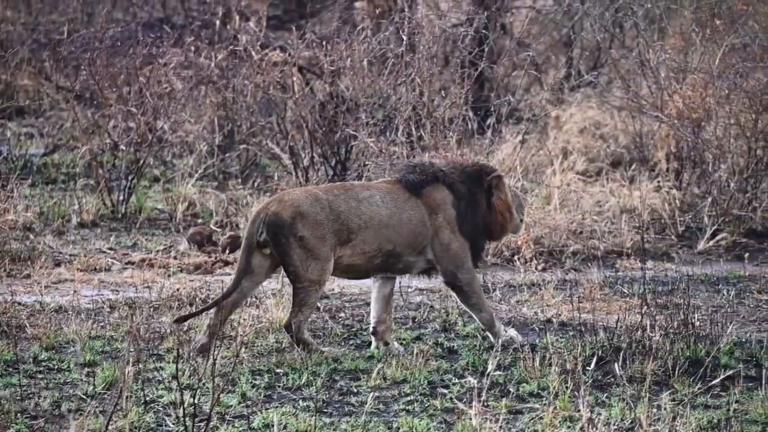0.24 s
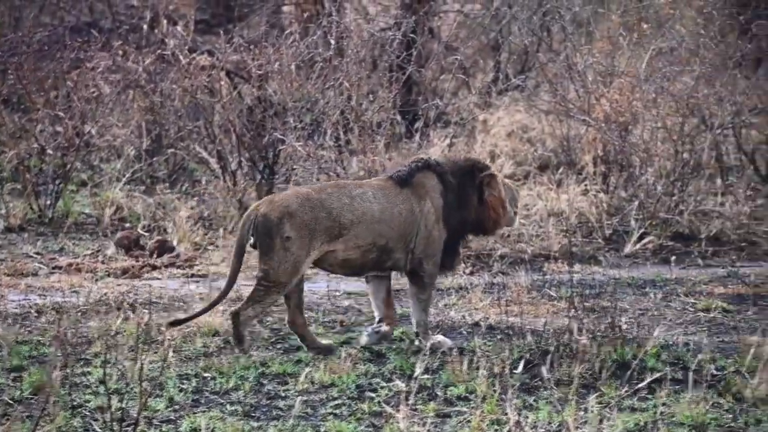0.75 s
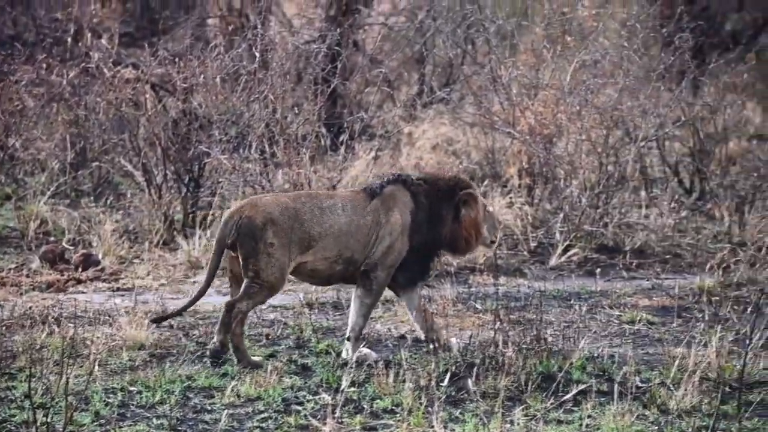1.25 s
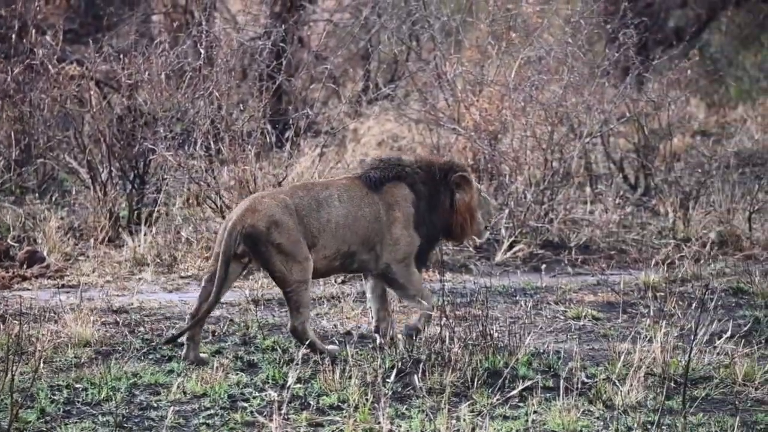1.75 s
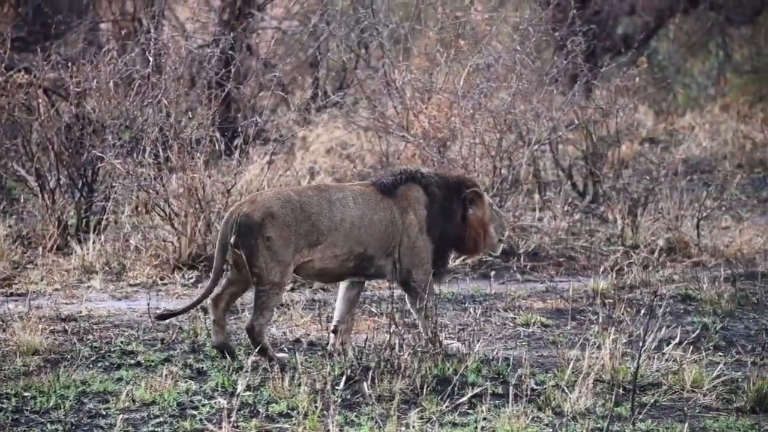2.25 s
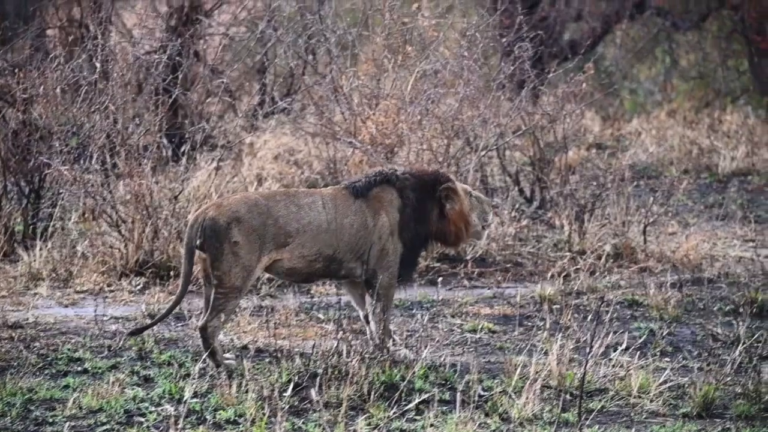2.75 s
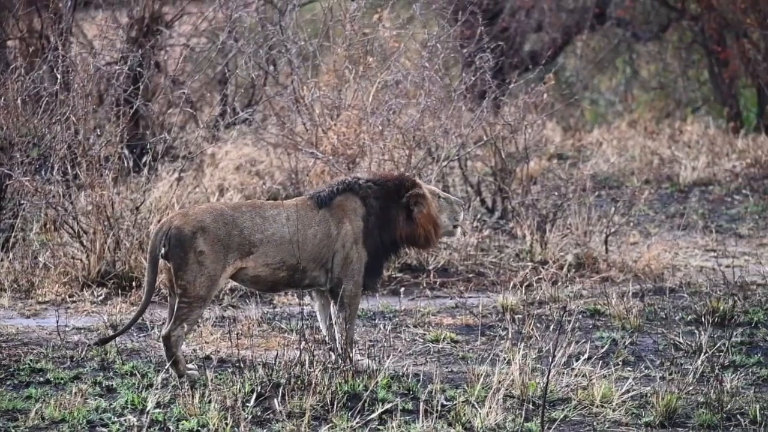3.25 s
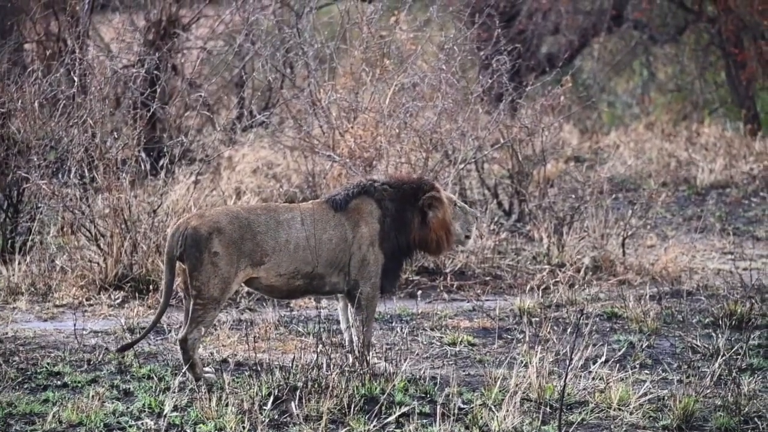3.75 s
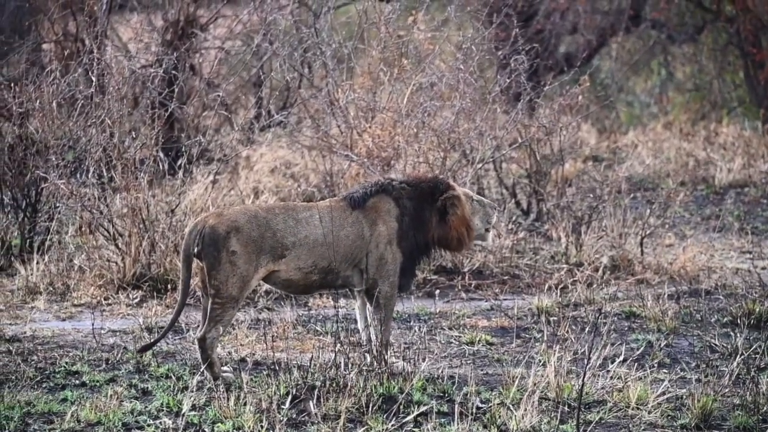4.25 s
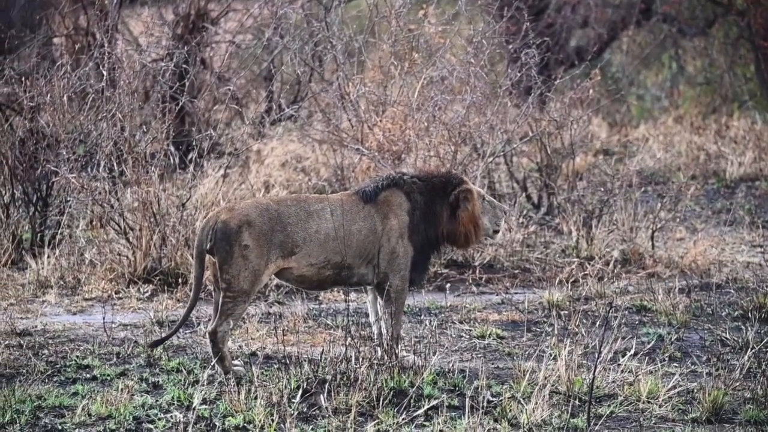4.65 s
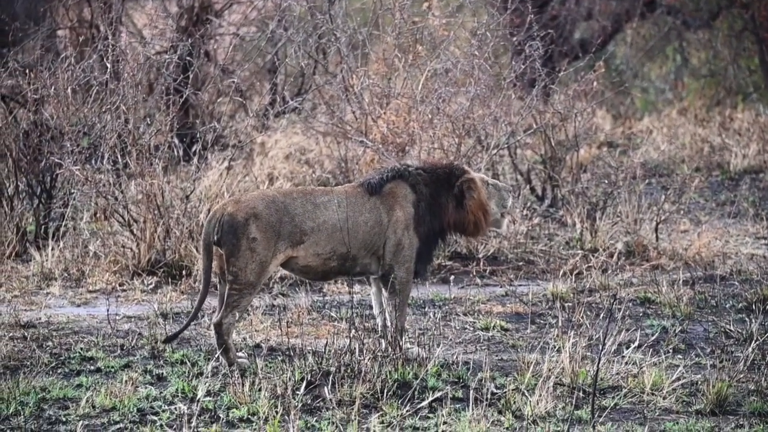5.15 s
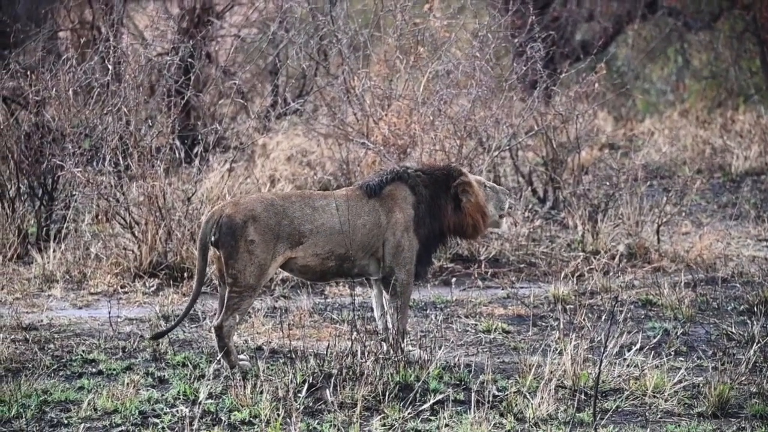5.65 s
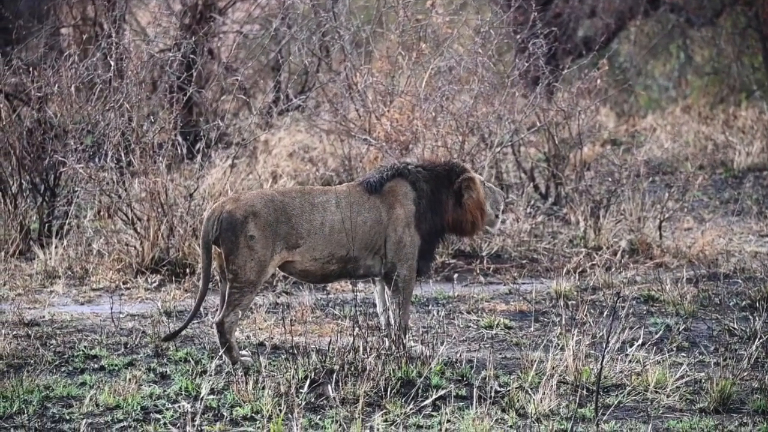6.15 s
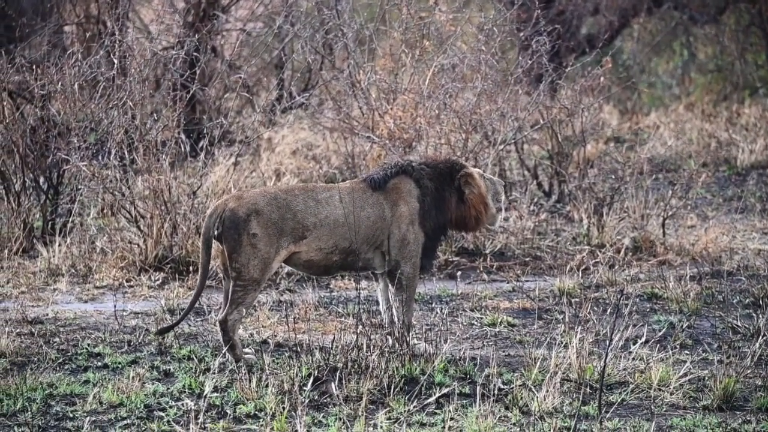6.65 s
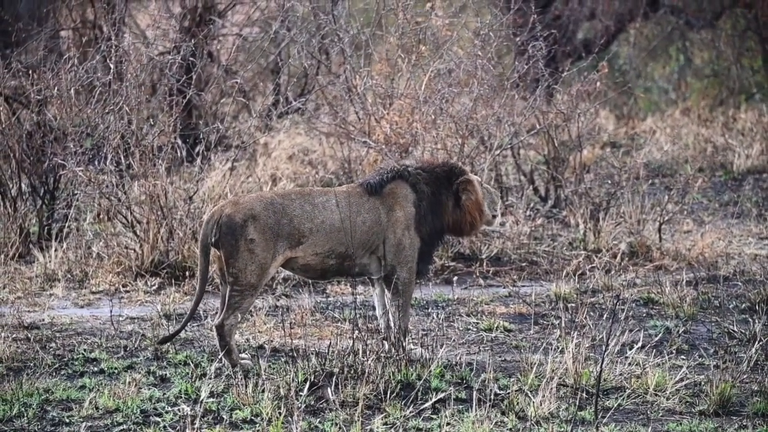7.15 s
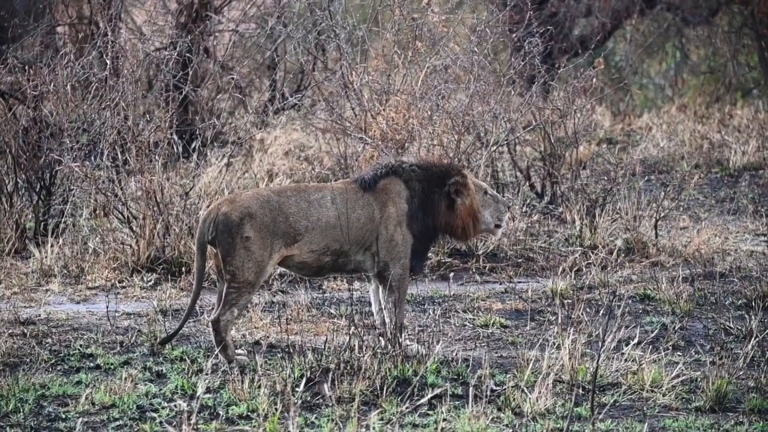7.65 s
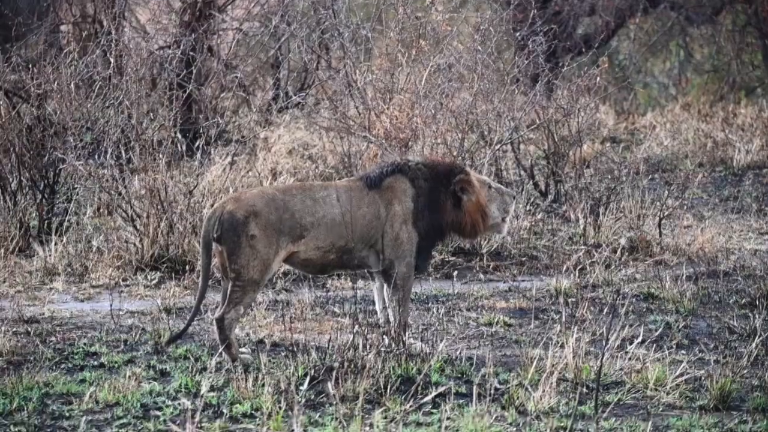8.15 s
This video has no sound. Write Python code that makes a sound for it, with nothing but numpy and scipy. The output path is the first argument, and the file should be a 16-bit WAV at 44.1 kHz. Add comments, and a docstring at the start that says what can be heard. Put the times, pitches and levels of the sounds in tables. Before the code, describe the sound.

A male lion gives four deep moaning roars and two short grunts in dry bush, with small birds chirping and wind bumping the microphone.

```python
"""Open bush: a male lion moans and grunts; birds call, wind bumps the microphones, the bush hisses, dry snaps tick.
Lion: two oscillators. The deep one stays near the chest resonance; the vocal folds climb away from it at the
height of a roar and rejoin it as the roar falls. Both bend one airflow, which throat and mouth resonances shape.
Birds: gliding sines with echoes. Bush, hiss and wind: filtered noise. Wind bumps: decaying low swings with grit.
Ticks: short treble noise. A thin whine of steady sines sets in near the end."""
import sys
import numpy as np
from scipy import signal
from scipy.fft import rfft, irfft, next_fast_len
from scipy.io import wavfile
from scipy.ndimage import uniform_filter1d, minimum_filter1d, map_coordinates

SR = 44100
rng = np.random.default_rng(int(sys.argv[2]) if len(sys.argv) > 2 else 0)


def master(y):
    """Save y as 16-bit WAV."""
    cut = np.clip(np.atleast_2d(y).T, -1, 1)
    pcm = np.round(cut * 32767)  # scale
    wavfile.write(sys.argv[1], SR, pcm.astype(np.int16))


N = 371322
T = np.arange(N) / SR

# Far rustle spectrum: (frequency [Hz], relative density [dB per Hz])
RUSTLE_SPECTRUM = [(50, -5.5), (110, 7), (210, -1), (400, -3), (550, -11.5), (1000, -12), (1800, -15),
                   (2900, -21.5), (3700, -22), (7000, -39.5), (12000, -71)]
# Rustle width: (frequency [Hz], side minus mid [dB])
RUSTLE_WIDTH = [(60, -24.5), (200, -23), (550, -11.5), (1650, -2.5), (4000, 3)]
# Microphone hiss spectrum: (frequency [Hz], relative density [dB per Hz])
HISS_SPECTRUM = [(2000, -30.5), (5000, 1.5), (8000, -6), (16000, -18.5)]
# the hiss sinks slowly, then returns with the whine
HISS_START_DB, HISS_SINK_DB_PER_S, HISS_LATE_DB = -56.5, 1.14, -58

# Wind buffeting spectrum: (frequency [Hz], relative density [dB per Hz])
BUFFET_SPECTRUM = [(15, -12.5), (40, 4), (120, -3.5), (400, -54)]
# Buffet level, right; left is 3 dB up: (time [s], level [dB])
BUFFET_LEVEL = [(0, -68), (2.2, -57), (2.8, -29), (3.2, -49.5), (4.3, -57.5), (5.4, -40), (8.42, -36.5)]
# Wind bumps, before decay and channel offsets: (time [s], level [dB], mean pitch [Hz])
WIND_BUMPS = [(2.304, -17.5, 75), (2.779, -10, 155), (2.811, -15, 74.8), (6.295, -22, 149.7),
              (7.549, -11.5, 99), (7.573, -17.5, 130), (7.598, -13, 126), (7.918, -20.5, 90),
              (7.979, -13, 99.3), (7.992, -14.5, 90.5), (8.027, -17, 170), (8.039, -16.5, 70),
              (8.059, -9.5, 150.4)]
GRIT_DB, GRIT_CUTOFF_HZ = -19, 503  # scratchy start of a bump

# Steady whine tones, before flutter: (frequency [Hz], rms level [dB])
WHINE_TONES = [(557, -54.5), (4969, -68), (8285, -76), (14917, -83)]
WHINE_START_S = 7.55
# Dry snaps, before decay, trim and filter: (time [s], level [dB])
SNAPS = [(0.4443, -28), (4.376, -23.5), (7.6663, -23.5), (7.7567, -27), (8.1582, -19.5)]

# Bird notes; levels before waver, pan and echo
# Whistles with a strong overtone: (time [s], level [dB])
WHISTLE_NOTES = [(0.243, -44), (1.01, -37), (1.7904, -38.5), (2.6326, -38.5), (3.464, -37), (4.3416, -42)]
# Falling slides: (time [s], level [dB])
SLIDE_NOTES = [(2.5367, -56), (2.922, -52)]
# Short chips: (time [s], level [dB])
CHIP_NOTES = [(0.4386, -39.5), (0.5499, -42), (1.131, -39.5), (1.3473, -41), (1.959, -40), (2.1675, -29),
              (2.3983, -39.5), (3.03, -38.5), (3.263, -39.5)]
CHIP_CENTRE_HZ = 2339
# Thin high notes: (time [s], length [s], start [Hz], end [Hz], level [dB])
THIN_PIPS = [(3.724, 0.075, 5150, 5270, -55), (4.369, 0.2, 3795, 3690, -54.5),
             (7.554, .025, 4830, 4430, -45.5), (7.59, 0.03, 4870, 5100, -52),
             (7.687, 0.011, 4800, 4740, -35.5), (8.168, 0.03, 5260, 4984, -52.5)]
# Five quick falling notes, pitch and level varied: (time [s], spacing [s], pitch [Hz], fall [Hz], level [dB])
QUICK_RUNS = [(2.232, .021, 2500, 900, -36), (4.685, .078, 2980, 100, -45)]
# Fast warbles: (time [s], length [s], start and end [Hz], top before swing [Hz], swing [Hz], level [dB])
WARBLES = [(3.2, 0.2, 3484, 5490, 473, -47), (6.898, 0.22, 3610, 6300, 352, -57.5)]
WARBLE_PULSE_DEPTH = 0.34  # 0-1
ECHO_DB, ECHO_T60_S = -4, .35

# Lion; levels before the roughness flutter
# Roars, one list per call: (time [s], deep pitch [Hz], deep tone [dB], overtones [dB], rasp [dB])
ROAR_CALLS = [
    [(0.0, 129, -29, -70, -52), (0.066, 148.9, -21, -42.5, -53), (0.186, 166.1, -40, -35.5, -55),
     (0.47, 158.7, -39.5, -39, -49.5), (0.598, 177.7, -26.5, -30.5, -43.5), (0.7, 152, -12, -37, -44.5),
     (0.972, 130.3, -13, -35.5, -49), (1.062, 120, -23, -49, -48.5), (1.2, 119.6, -35, -57, -56)],
    [(2.37, 108.9, -40, -47, -57), (2.444, 140, -19.5, -45, -51), (2.494, 152.2, -9, -41, -44),
     (2.646, 177, -21.5, -32, -48), (2.914, 178.7, -30, -29.5, -38.5), (3.014, 159, -11.5, -33.5, -39),
     (3.152, 144.1, -12, -41, -44.5), (3.364, 135.2, -16.5, -36.5, -46), (3.388, 123.5, -20.5, -44, -53),
     (3.5, 140, -33, -46.5, -66)],
    [(5.13, 138.2, -36, -52, -62.5), (5.198, 153.6, -6.5, -35.5, -37.5), (5.31, 183.8, -18, -39.5, -48.5),
     (5.4, 185.3, -26.5, -37, -40.5), (5.51, 171.7, -12.5, -28, -38.5), (5.656, 155.8, -12, -45.5, -43.5),
     (5.754, 133, -14, -36.5, -45), (5.796, 116.5, -18, -41, -46), (5.9, 117.7, -27.5, -56, -80)],
    [(6.42, 146.5, -44, -61, -68), (6.484, 153.9, -10, -45, -52), (6.566, 198, -15, -39.5, -48.5),
     (6.65, 173.5, -54, -51.5, -63), (6.802, 187, -37, -34, -38), (6.88, 167, -12, -24, -33.5),
     (7.004, 150.2, -11.5, -60, -48), (7.098, 128, -16, -32.5, -43.5), (7.164, 104.5, -18.5, -63, -66),
     (7.25, 101.9, -37, -59, -72)],
]
# Grunts, one list per call: (time [s], deep pitch [Hz], deep tone [dB], overtones [dB], rasp [dB])
GRUNT_CALLS = [
    [(4.13, 127, -50, -43, -65), (4.19, 135.3, -17, -43.5, -44), (4.274, 126, -10.5, -37, -46),
     (4.414, 112.1, -15.5, -45.5, -51), (4.504, 110.7, -29.5, -42, -63), (4.6, 117.8, -30.5, -62, -72)],
    [(8.08, 157, -28.5, -37, -68), (8.126, 157.8, -12.5, -42.5, -43), (8.26, 155.1, -12, -40, -44.5),
     (8.32, 142.7, -12.5, -38, -40.5), (8.388, 122.7, -16.5, -37.5, -39.5), (8.42, 126.4, -15.5, -39, -43)],
]
# Folds leave the deep tone for a plateau:
# (time [s], length [s], pitch at plateau start [Hz], at plateau end [Hz], plateau tone [dB])
FOLD_CLIMBS = [(0.071, .62, 238, 236, -38), (2.539, 0.51, 249.6, 231.1, -35),
               (5.242, .39, 253.1, 239.9, -36), (6.585, .32, 245.5, 272, -40)]
CLIMB_S, DROP_S = .12, .15
JOIN_DB = 20.5  # gain of the fold tone where it meets the deep one
FADE_S = 0.026  # edges of calls and climbs
# Resonances below are applied twice; values are for one pass
# Throat: (frequency [Hz], width [Hz], level [dB])
THROAT_MODES = [(275, 70, 0), (440, 100, 0), (600, 100, -5)]
# Mouth: (frequency [Hz], width [Hz], level [dB])
MOUTH_MODES = [(820, 240, -1), (1130, 150, 0), (2300, 1800, -10)]
# Mouth wide open at the height of a roar: (frequency [Hz], width [Hz], level [dB])
GAPE_MODES = [(880, 170, -7), (1250, 130, 0), (2300, 1800, -12)]
# Chest: (frequency [Hz], width [Hz], level [dB])
CHEST_MODES = [(127, 110, 3.5), (261, 88, -5)]
GAPE_GAP_HZ = 50  # gap between the pitches at which the mouth is wide open
FOLD_DRIVE, DEEP_DRIVE = 2.0, 1.1  # how hard each oscillator bends the airflow
CRUMBLE_DB = -9.5  # noisy flapping re deep tone, before roughness
# Voice breaks up late in each call, with a puff of air: (time [s], puff [dB])
BREAK_UPS = [(1.03, -42), (3.33, -44), (4.45, -52.5), (5.78, -40), (7.16, -55), (8.385, -48)]
BREAK_S, CHOP_KNOTS_PER_S = .25, 55
# Puff spectrum: (frequency [Hz], relative density [dB per Hz])
PUFF_SPECTRUM = [(600, -19.5), (1100, 1.5), (7000, -17.5), (12000, -53)]
PUFF_HALF_WIDTH_S = .035
# Folds slip: deep tone falters, then a throaty burst: (time [s], burst [dB])
FOLD_SLIPS = [(.797, 9.5), (.868, 10.5), (.942, 10), (1.008, 8), (3.055, 1.5), (3.215, 6), (3.275, 9.5),
              (3.354, 7.5), (4.25, 4), (4.345, 5), (5.52, 1), (5.553, 2.5), (5.585, 4.5), (5.622, 2),
              (5.662, 7.5), (6.553, 10.5), (7.12, 9.5)]
FALTER_DEPTH, FALTER_HALF_WIDTH_S, BURST_S = .4, .007, .03  # depth 0-1

LIMIT_CEILING, BAND_LIMIT_HZ = .41, 15780


def amp(db):
    """Decibels to gain."""
    return 10 ** (np.asarray(db) / 20)


def unit(x):
    """Scaled to rms 1."""
    return x / np.sqrt(np.mean(x ** 2) + 1e-20)


def along(points, hz):
    """(Hz, value) points read on a log frequency axis."""
    f, v = np.transpose(points)
    return np.interp(np.log(hz + 1), np.log(f + 1), v)


def curves(rows):
    """One value per sample for each column after the time."""
    s, *cols = np.transpose(rows)
    return [np.interp(T, s, c) for c in cols]


def ramp(start_s, end_s, rise_s, fall_s):
    """0 outside start..end, with straight edges up to 1."""
    return np.clip(np.minimum((T - start_s) / rise_s, (end_s - T) / fall_s), 0, 1)


def bell(centre_s, half_width_s):
    """Gaussian in time, peak 1."""
    return np.exp(-((T - centre_s) / half_width_s) ** 2)


def wobble(knots_per_s):
    """Smooth random curve."""
    knots = rng.standard_normal(int(N * knots_per_s / SR) + 4)
    return map_coordinates(knots, [T * knots_per_s])


def phase_of(hz):
    """Phase in radians of a varying pitch."""
    return 2 * np.pi * np.cumsum(hz) / SR


def filtered(x, response):
    """x times a complex response of frequency."""
    m = next_fast_len(N + SR // 2)
    return irfft(rfft(x, m) * response(np.fft.rfftfreq(m, 1 / SR)), m)[..., :N]


def coloured(x, spectrum):
    """x shaped by a (Hz, dB) spectrum, rms 1."""
    return unit(filtered(x, lambda hz: amp(along(spectrum, hz))))


def through(x, table):
    """x through resonances of alternating sign, twice, then levelled over 1/8 s."""
    def response(f):
        total = 0
        for k, (centre, width, db) in enumerate(table):
            band = 1j * f * width / (centre ** 2 - f ** 2 + 1j * f * width)
            total = total + (-1) ** k * amp(db) * band
        return total ** 2
    y = filtered(x, response)
    return y / np.sqrt(np.abs(uniform_filter1d(y ** 2, SR // 8)) + 1e-12)


def placed(x, pan_db, delay_samples):
    """Stereo placement: louder on the left by pan_db, late on the right."""
    late = np.pad(x, (delay_samples, 0))[:N]
    return np.array([x * amp(pan_db / 2), late * amp(-pan_db / 2)])


def echoes(x, t60_s):
    """Scattered answers from trees: decaying noise tail, different at each microphone."""
    t = np.arange(SR // 2) / SR
    tail = rng.standard_normal((2, len(t))) * amp(-60 * t / t60_s) * (t > .01)
    return signal.fftconvolve(x[None], tail / np.linalg.norm(tail[0]), axes=1)[:, :N]


def bush():
    """Patchy far rustle, wide in the treble, under an unrelated hiss at each microphone."""
    z = signal.stft(rng.standard_normal((2, N)), nperseg=512)[2]
    patches = uniform_filter1d(rng.standard_normal(z.shape[1:]), 5, 0)
    patches = unit(uniform_filter1d(patches, 10, 1))
    pair = signal.istft(z * amp(2 * patches), nperseg=512)[1][:, :N]

    def mid_side(hz):
        return amp(along(RUSTLE_SPECTRUM, hz) + [0 * hz, along(RUSTLE_WIDTH, hz)])
    mid, side = filtered(pair, mid_side)
    rustle = amp(-39.5) * unit(np.array([1.09 * (mid + side), mid - side]))
    hiss = coloured(rng.standard_normal((2, N)), HISS_SPECTRUM)
    hiss_db = np.where(T < WHINE_START_S, HISS_START_DB - HISS_SINK_DB_PER_S * T, HISS_LATE_DB)
    return rustle + amp(hiss_db) * hiss


def wind():
    """Lumpy buffeting that differs between the ports, and single low bumps."""
    lumps = amp(1.4 * wobble(2.7) + 4.1 * np.array([wobble(22), wobble(12)]))
    rumble = filtered(rng.standard_normal((2, N)), lambda hz: amp(along(BUFFET_SPECTRUM, hz)))
    out = amp(curves(BUFFET_LEVEL)[0] + np.array([[3], [0]])) * unit(lumps * rumble)
    t = np.arange(SR // 8) / SR
    low_pass = signal.butter(2, GRIT_CUTOFF_HZ, fs=SR, output="sos")
    for s, db, hz in WIND_BUMPS:
        # the eddy's pace drifts
        swirl = 1 + .25 * np.cumsum(rng.standard_normal(len(t))) / np.sqrt(SR / 100)
        push = np.sin(phase_of(hz * swirl)) * amp(-60 * t / 0.07) * (1 - np.exp(-t / 0.002))
        grit = unit(signal.sosfilt(low_pass, rng.standard_normal((2, len(t)))))
        bump = push + amp(GRIT_DB - 60 * t / 0.054) * grit
        k = int(s * SR)
        out[:, k:k + len(t)] += amp(db + np.array([[4], [-1]])) * bump
    return out


def whine():
    """Thin, slightly unsteady sines that switch on late."""
    tones = sum(amp(db + 2.2 * wobble(9.0)) * np.sin(2 * np.pi * hz * T) for hz, db in WHINE_TONES)
    return np.sqrt(2) * tones * (T > WHINE_START_S)


def ticks():
    """Dry treble snaps: noise decaying 60 dB in 11 ms, band-passed."""
    out, t = np.zeros((2, N)), np.arange(SR // 50) / SR
    for s, db in SNAPS:
        snap = amp(db - 5.5 - 60 * t / 0.011) * rng.standard_normal((2, len(t)))
        out[:, int(s * SR):][:, :len(t)] += snap
    return filtered(out, lambda hz: 1 / (1 + (5000 / (hz + 1)) ** 4) / (1 + (hz / 11000) ** 4))


def add_note(track, s, length_s, hz, db, overtone_db=-60, fall=0.4):
    """Adds a whistled note with an octave overtone; pitch follows hz(u), u from 0 to 1."""
    u = np.arange(int(length_s * SR)) / (length_s * SR)
    phase = phase_of(hz(u))
    shape = np.minimum(u * length_s / .007, 1) * (1 - u) ** fall
    wave = np.sin(phase) + amp(overtone_db) * np.sin(2 * phase)
    track[int(s * SR):][:len(u)] += amp(db) * shape * wave


def warbles():
    """Arched notes whose pitch and loudness pulse together."""
    flutter = np.sin(phase_of(150 + 25 * wobble(33)))  # never quite even
    track = np.zeros(N)
    for s, length_s, edge_hz, top_hz, swing_hz, db in WARBLES:
        def pitch(u):
            arch = np.interp(u, [0, .33, .8, 1], [0, 1, 1, 0])
            swing = swing_hz * np.sqrt(arch) * flutter[int(s * SR):][:len(u)]
            return edge_hz + (top_hz - edge_hz) * arch + swing
        add_note(track, s, length_s, pitch, db, fall=0.44)
    return track * (1 + WARBLE_PULSE_DEPTH * flutter) * amp(4 * wobble(60))


def birds():
    """Gliding sines: whistles, slides, chips, pips, runs and warbles, placed left, with echoes."""
    near, far = np.zeros(N), np.zeros(N)
    for s, db in WHISTLE_NOTES:
        add_note(near, s, .09, lambda u: 2490 + 150 * (1 - u) ** 1.3, db, overtone_db=-13)
    for s, db in SLIDE_NOTES:
        add_note(far, s, .12, lambda u: 2450 + 1550 * (1 - u) ** 1.9, db, fall=0.34)
    for s, db in CHIP_NOTES:
        add_note(near, s, .035, lambda u: CHIP_CENTRE_HZ * (1.04 - .08 * u), db, overtone_db=-25.5)
    for s, length_s, start_hz, end_hz, db in THIN_PIPS:
        add_note(far, s, length_s, lambda u: end_hz + (start_hz - end_hz) * (1 - u) ** 2, db)
    for s, gap_s, hz, fall_hz, db in QUICK_RUNS:
        for k, (a, b) in enumerate(rng.standard_normal((5, 2))):
            def pitch(u):
                return hz + fall_hz * ((1 - u) ** 3 * (1 + a / 2) + a / 10)
            add_note(near, s + k * gap_s, .016, pitch, db + 2 * b)
    # the notes waver on their way through the bush
    near = near * amp(4 * wobble(120))
    far = far * amp(4 * wobble(120)) + warbles()
    direct = placed(near, pan_db=10.0, delay_samples=8) + placed(far, pan_db=18, delay_samples=5)
    return direct + amp(ECHO_DB) * echoes(near + far, ECHO_T60_S)


def climbs(deep_hz):
    """Gap between fold and deep pitch [Hz], and fold tone gain."""
    gap_hz, gain = 0, 0
    for s, length_s, first_hz, last_hz, db in FOLD_CLIMBS:
        end_s = s + length_s
        up = np.sin(np.pi / 2 * ramp(s, end_s, CLIMB_S, DROP_S))
        plateau_hz = np.interp(T, [s + CLIMB_S, end_s - DROP_S], [first_hz, last_hz])
        gap_hz = gap_hz + up * (plateau_hz - deep_hz)
        gain = gain + ramp(s, end_s, FADE_S, FADE_S) * amp(db + JOIN_DB * (1 - up))
    return gap_hz, gain


def lion():
    """Deep tone, fold tone, their combination tones in the throat and airflow rasp in the mouth."""
    calls = sorted(ROAR_CALLS + GRUNT_CALLS, key=lambda c: c[0][0])
    deep_hz, deep_db, over_db, rasp_db = curves(np.vstack(calls))
    on = sum(ramp(c[0][0] - FADE_S, c[-1][0] + FADE_S, FADE_S, FADE_S) for c in calls)
    gap_hz, fold_gain = climbs(deep_hz)

    broken = sum(ramp(s, s + BREAK_S, FADE_S / 2, FADE_S) for s, _ in BREAK_UPS)
    puffs = sum(amp(db) * bell(s, PUFF_HALF_WIDTH_S) for s, db in BREAK_UPS)
    falter = sum(FALTER_DEPTH * bell(s, FALTER_HALF_WIDTH_S) for s, _ in FOLD_SLIPS)
    burst_db = sum(db * ramp(s, s + BURST_S + FADE_S, FALTER_HALF_WIDTH_S / 2, FADE_S)
                   for s, db in FOLD_SLIPS)
    # slack folds at low pitch flap unevenly
    rough = np.maximum(np.clip((158 - deep_hz) / 60, .05, .3), .9 * broken)
    # in a break-up the swing stalls and restarts
    stall = np.tanh(.8 + 1.1 * wobble(CHOP_KNOTS_PER_S))
    chop = (1 - broken) * (1 - falter) + broken * stall

    deep = phase_of(deep_hz * (1 + 0.121 * rough * wobble(45)))
    fold = deep + phase_of(gap_hz * (1 + 0.08 * wobble(30)))
    deep_tone = on * chop * amp(deep_db + 3 * rough * wobble(35)) * np.sin(deep)
    tones = deep_tone + fold_gain * np.sin(fold)

    # both swings bend one airflow: lines at sums of both pitches
    bend = FOLD_DRIVE * np.exp(1j * fold) + DEEP_DRIVE * np.exp(1j * deep)
    sums = np.exp(bend).real * amp(1.5 * wobble(40))
    # the folds snap shut once a cycle
    snaps = np.exp(25 * (np.cos(fold) - 1)) * (1 + 2 * np.cos(deep))
    flow = unit(rng.standard_normal(N) * (1.1 + np.exp(2 * (np.cos(fold) - 1))))
    breath = through(flow, THROAT_MODES)
    throat = np.sqrt(1 - rough / 2) * through(sums, THROAT_MODES) + np.sqrt(rough / 2) * breath
    airflow = unit(np.gradient(snaps)) + 1.6 * flow
    wide = np.clip(gap_hz / GAPE_GAP_HZ, 0, 1)
    mouth = np.sqrt(1 - wide) * through(airflow, MOUTH_MODES)
    mouth = mouth + np.sqrt(wide) * through(airflow, GAPE_MODES)

    growl = amp(burst_db + 3 * np.sqrt(rough) * wobble(30))  # uneven flaps come in bursts
    crumble = rough * amp(deep_db + CRUMBLE_DB - burst_db / 2) * through(flow, CHEST_MODES)
    shaped = amp(over_db) * throat + amp(rasp_db) * mouth + crumble
    voice = np.sqrt(2) * tones + on * growl * shaped
    voice = voice + puffs * coloured(flow, PUFF_SPECTRUM)
    return placed(voice, pan_db=.5, delay_samples=5) + amp(-28) * echoes(voice, t60_s=.8)


def scene():
    """All sources at the two microphones."""
    return bush() + wind() + whine() + ticks() + birds() + lion()


def record(dry):
    """Limiter with one gain for both channels, holding peaks at a ceiling; then a steep low-pass."""
    need = np.minimum(1, LIMIT_CEILING / (np.abs(dry).max(axis=0) + 1e-9))
    gain = uniform_filter1d(minimum_filter1d(need, SR // 60), SR // 100)
    steep = signal.ellip(10, .1, 70, BAND_LIMIT_HZ, fs=SR, output="sos")
    return signal.sosfilt(steep, dry * gain)


dry = scene()
out = record(dry)
master(out)
```